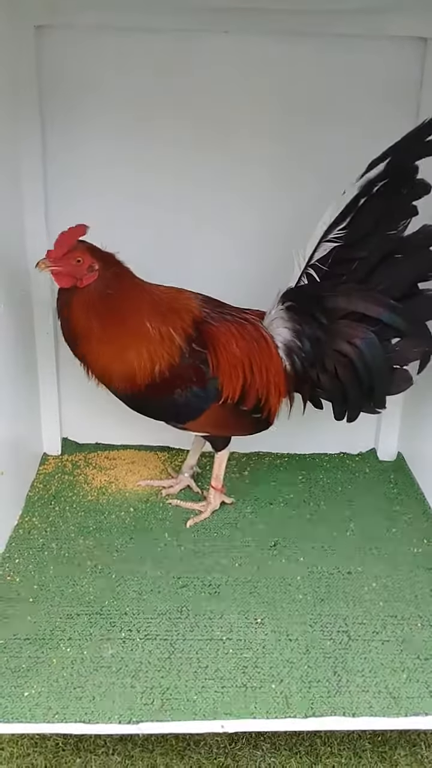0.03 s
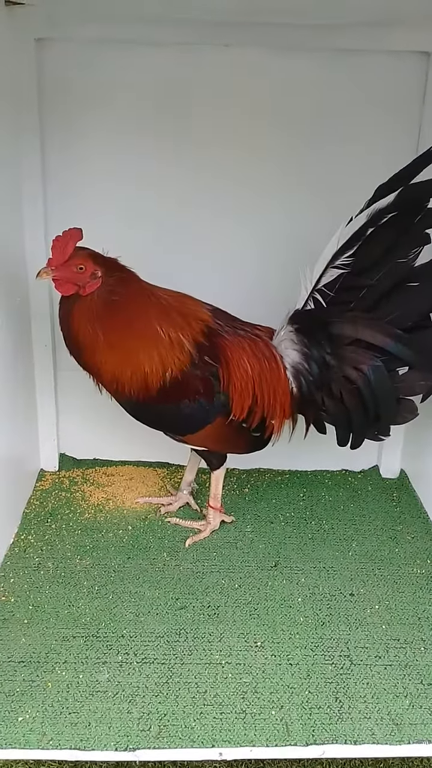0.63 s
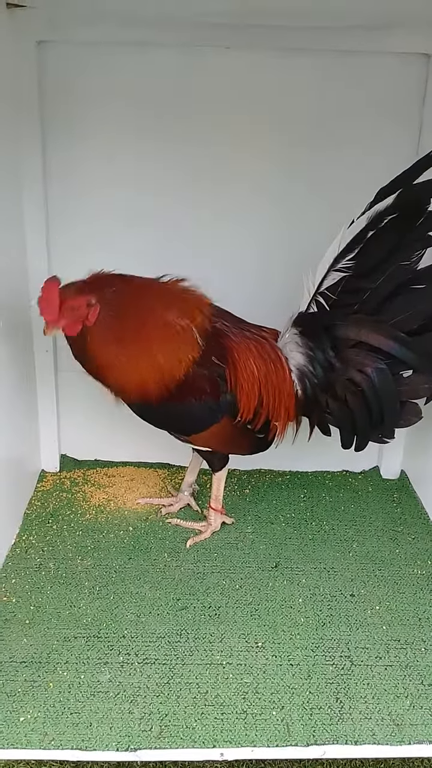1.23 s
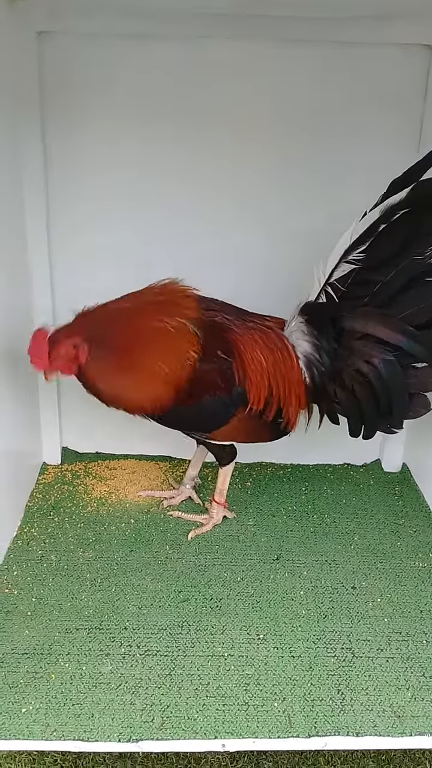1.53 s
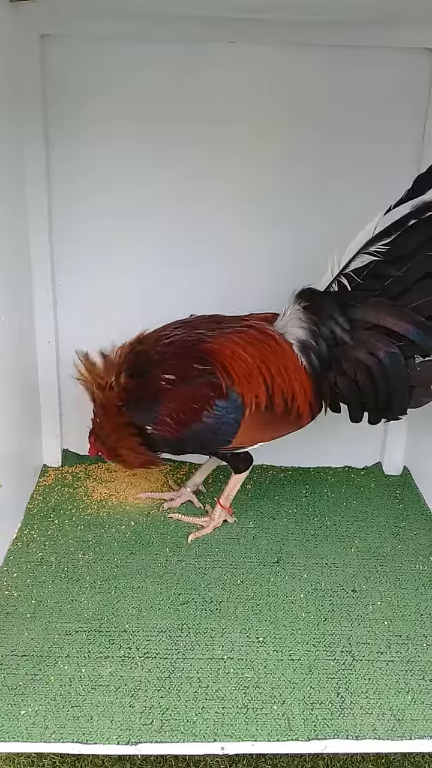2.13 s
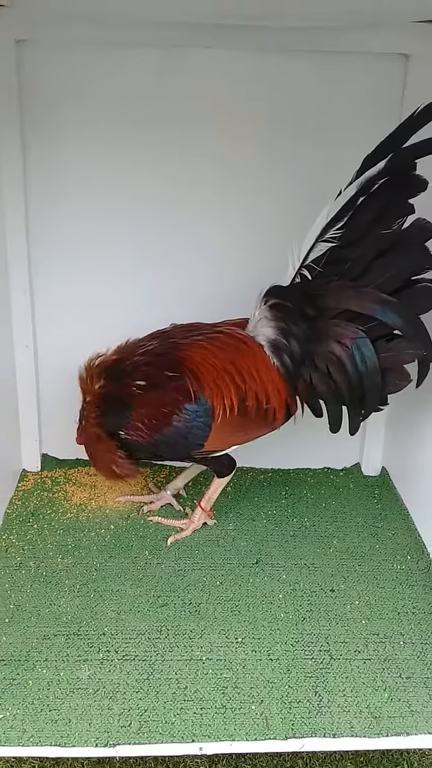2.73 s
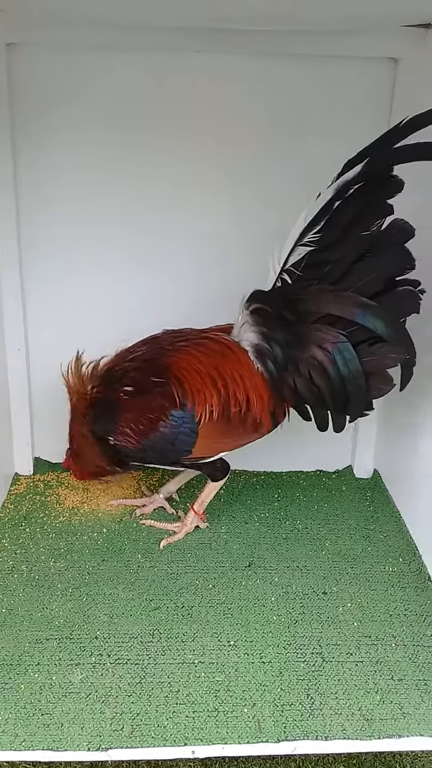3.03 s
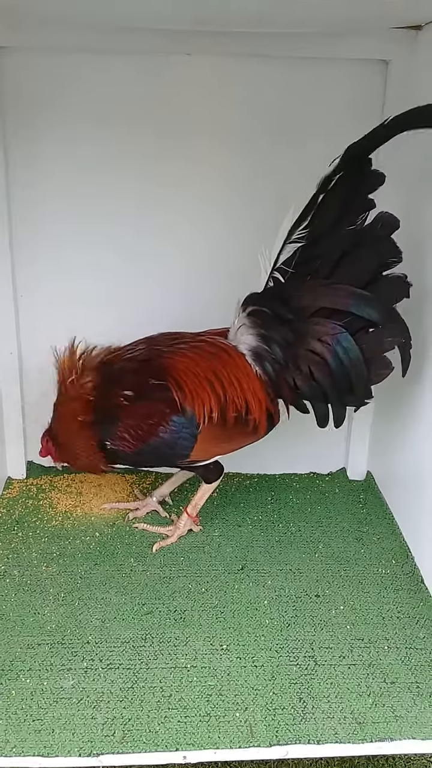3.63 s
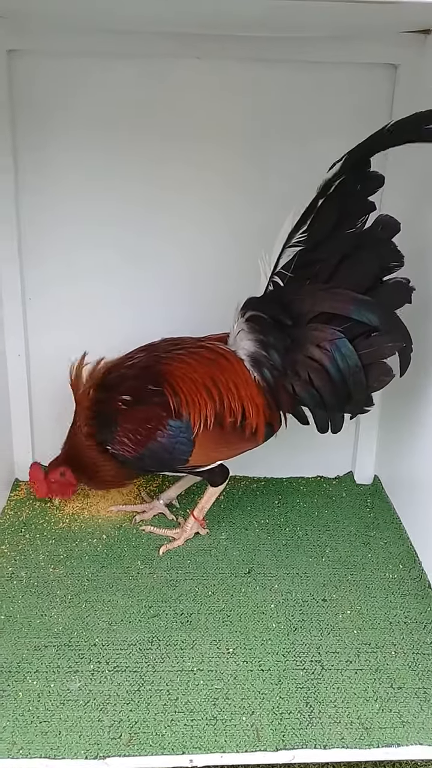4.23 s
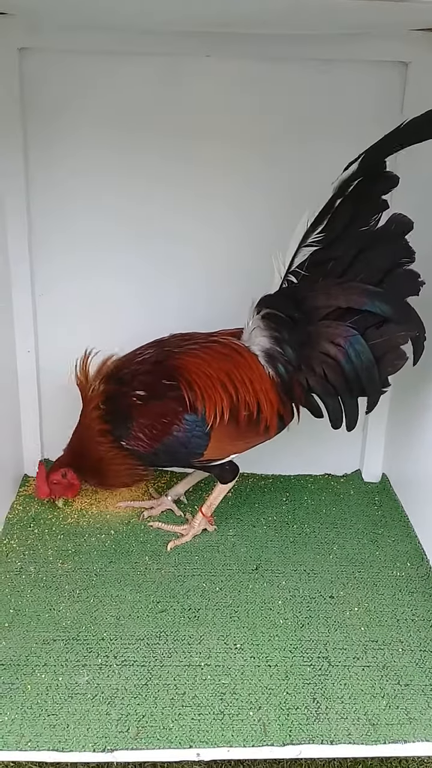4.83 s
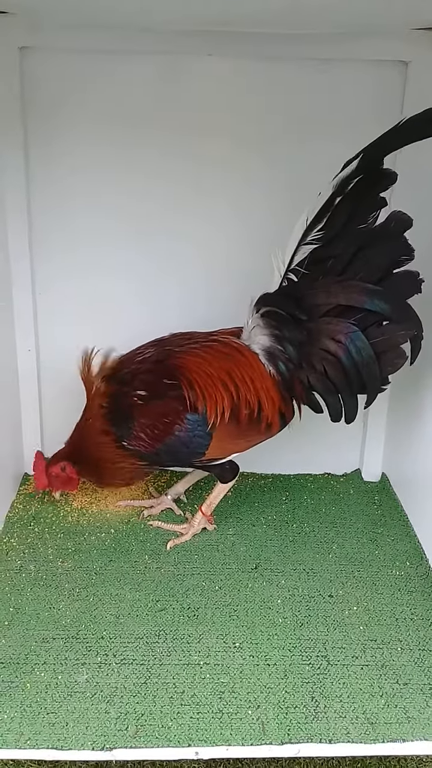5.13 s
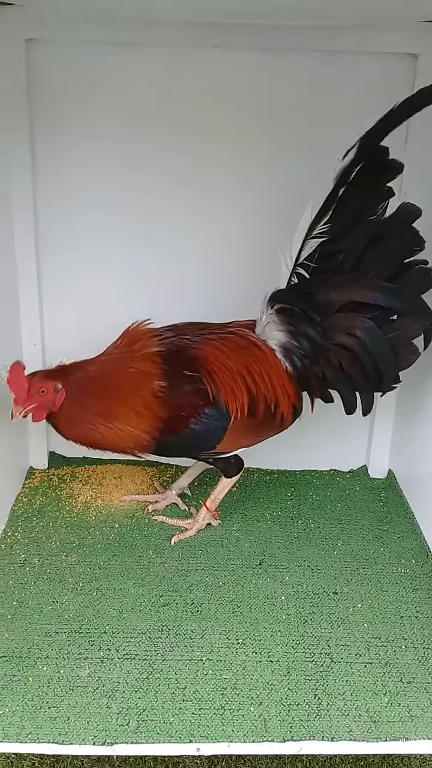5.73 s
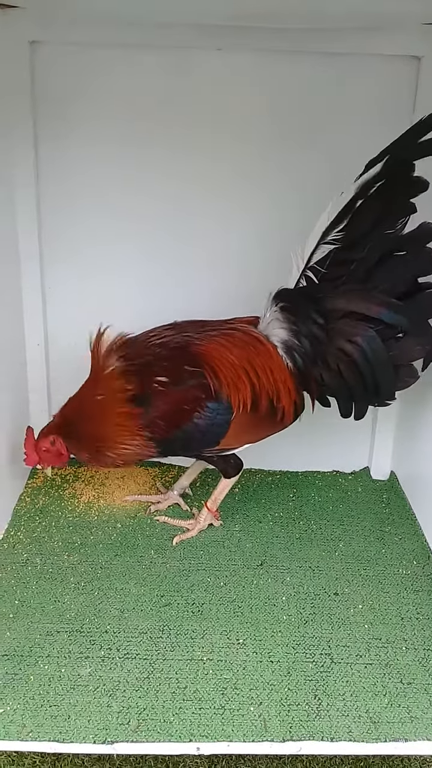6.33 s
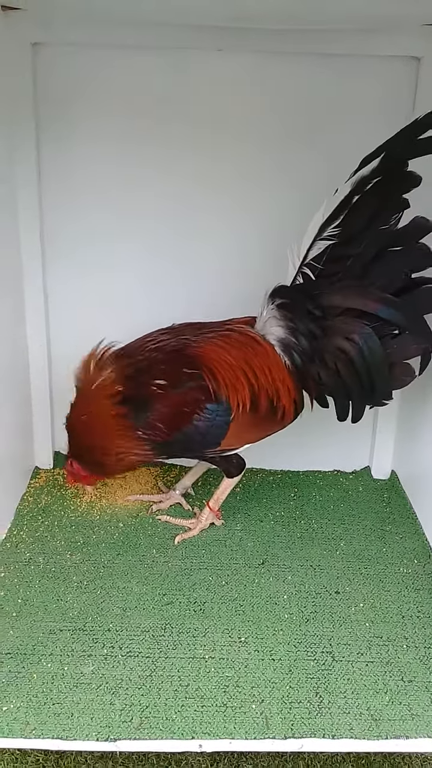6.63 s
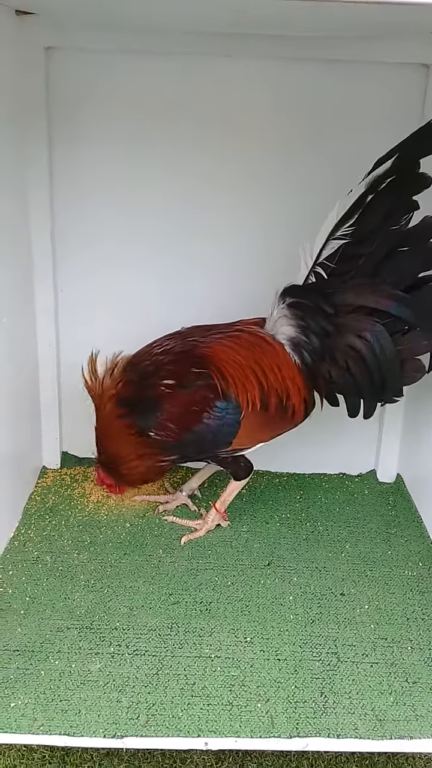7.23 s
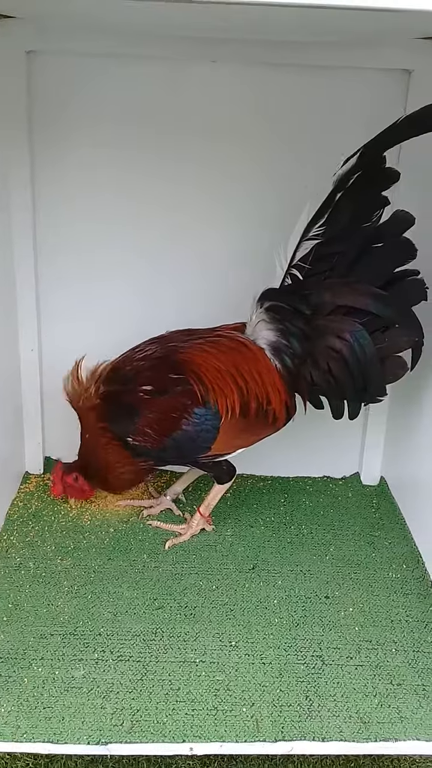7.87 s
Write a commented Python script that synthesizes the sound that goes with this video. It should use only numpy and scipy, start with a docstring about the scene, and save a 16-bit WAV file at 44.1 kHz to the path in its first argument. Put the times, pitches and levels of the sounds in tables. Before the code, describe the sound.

A faint outdoor background runs throughout, with thin chirps from small birds. In the first second come light scuffing pecks at grain on a turf mat, a soft cluck and a distant rooster. At about 1.2 seconds a nearby rooster crows, loud and raspy, in four syllables with a held last note, ending near 2.6 seconds with a short echo. Dull thumps on the pen's hollow floor land at about 2.3, 2.6 and 3.9 seconds, among quick pecks and tiny grain rattles. From 3 to 5.6 seconds roosters crow faintly across the yard, while short soft clucks and rustles come close by between 4.5 and 5.7 seconds. At 5.8 seconds a second nearby rooster crows, louder and equally hoarse, its last note sinking and ending near 7.2 seconds. Light pecks, soft knocks and faint far crowing continue to the end at about 8 seconds.

```python
"""Roosters around a pen

Two roosters crow in turn close to a small pen, where a third pecks grain from a turf mat on a hollow
floor and clucks. Each crow is two voices at once, one from each side of the syrinx, breaking into rasp
where they fight. More roosters answer from across the yard and small birds chirp, over soft rustles,
puffs of air and a faint outdoor background."""
import sys
import numpy as np
from scipy import signal
from scipy.fft import rfft, irfft, next_fast_len
from scipy.io import wavfile
from scipy.ndimage import map_coordinates

SR = 44100
rng = np.random.default_rng(int(sys.argv[2]) if len(sys.argv) > 2 else 0)


def int16_out(signal):
    """Quantize to a 16-bit WAV file."""
    q = np.round(np.clip(np.atleast_2d(signal).T, -1, 1) * 32767)
    wavfile.write(sys.argv[1], SR, q.astype(np.int16))


N = 357210


def near_roosters():
    """Source and filter: two birds crow in turn, each through its own syrinx and throat."""
    # Effort, one list a syllable. Each row: time in seconds, level in dB.
    effort_1, effort_2 = [
        [(1.17, -62.5), (1.178, -38), (1.212, -17), (1.278, -31.5), (1.288, -22), (1.346, -26), (1.42, -66.5)],
        [(1.43, -50), (1.434, -48.5), (1.45, -24.5), (1.504, -20), (1.58, -30.5)],
        [(1.58, -32.5), (1.628, -20.5), (1.756, -22.5), (1.802, -20.5), (1.948, -27), (1.984, -34),
         (1.992, -28), (2.1, -28.5)],
        [(2.1, -23), (2.124, -30), (2.15, -18.5), (2.18, -25), (2.3, -27), (2.306, -23.5), (2.612, -28),
         (2.62, -22)],
    ], [
        [(5.812, -43), (5.818, -29.5), (5.848, -16), (5.93, -14), (5.94, -19), (5.994, -18), (6.08, -19.5)],
        [(6.08, -26), (6.084, -24.5), (6.144, -10.5), (6.28, -18)],
        [(6.28, -15), (6.33, -14), (6.464, -12), (6.554, -16), (6.564, -10.5), (6.602, -20), (6.61, -11),
         (6.62, -23), (6.735, -33.5)],
        [(6.735, -26.5), (6.749, -30), (6.771, -9), (6.781, -21.5), (6.979, -14.5), (6.989, -23), (7.113, -28),
         (7.141, -18.5), (7.24, -39)],
    ]
    # Opening syllables. Each row: lower voice's start and end in Hz, upper voice's arch centre and
    # half-length in seconds and top in Hz, then in dB upper over lower voice, rasp over voices,
    # deep over bright rasp, overtone lift.
    opening_1, opening_2 = [(647, 670, 1.32, 0.071, 690, 10, -6.5, 3.5, -6),
                            (650, 679, 1.505, .08, 1008, -5, -4, 4.5, 5),
                            (683, 650, 1.77, 0.13, 788, 4.5, 0, -2.5, 3.5)], [(669.4, 596, 5.925, .14, 1005, 4, -4, 6.5, 1),
                                                   (580, 640, 6.195, 0.092, 1040, 1, -4, 5, 0.029),
                                                   (632, 540, 6.46, .15, 992, 10.5, -3.5, 2, 0.1)]
    # Closing syllable. Each row: time in seconds, lower and upper voice in Hz, then in dB upper over
    # lower voice, rasp over voices.
    closing_1, closing_2 = [(2.112, 626.6, 700, -18.5, -3), (2.159, 659.6, 750.6, -3.5, -13),
                            (2.22, 657.6, 852.4, 5, 6.5), (2.282, 650.2, 888.4, -5.5, -2),
                            (2.379, 637.6, 847, 5.5, -11), (2.45, 627, 812, 22, -17.5),
                            (2.62, 630, 807.8, 25, -11.5)], [(6.739, 589, 752, -7, -7), (6.77, 616.4, 747, 28, -12),
                                                   (6.793, 640, 865, 12, -8.5),
                                                   (6.936, 674.6, 861, -0.5, -35),
                                                   (6.976, 669.8, 756.5, -1, -17),
                                                   (7.015, 654, 735, -4.5, -10),
                                                   (7.141, 614.3, 695, -33, -37.5),
                                                   (7.181, 593, 700, -25, -10.5),
                                                   (7.239, 533.4, 692, -27, 4)]
    # The upper voice's rest pitch in Hz, and each voice's settings for syrinx() in dB.
    syrinx_1, syrinx_2 = dict(rest_hz=736, lower=dict(source_db=[-7, -7.5, 0, -3.5],
                          top_db=-14.5, tilt_db=4, carry_db=-9.5), upper=dict(source_db=[-1.5, -2.5, -9.5],
                          top_db=-3.5, tilt_db=-19.5, carry_db=-20)), dict(rest_hz=788, lower=dict(thin_db=-12, source_db=[-6, -2, -0.5, -7],
                                                top_db=-11, tilt_db=-9.5, carry_db=-1),
                                                upper=dict(source_db=[5, -5, -23],
                                                top_db=-11, tilt_db=-6, carry_db=-15))
    # Throat and beak above the lowest resonance. Each row: frequency in Hz, gain in dB.
    throat_1, throat_2 = [(900, -33.5), (1150, -1), (1400, 4), (1750, -1.5), (2050, 4), (2380, -7),
                          (2680, 2.5), (3100, -23.5), (3600, -7), (4400, -29), (5100, -29), (6050, -28),
                          (7000, -45.5), (8800, -75)], [(900, -27.5), (1150, 4), (1600, 0.5), (1900, 4), (2200, -7),
                                                (2520, 0), (3020, -23.5), (3350, -9), (3900, -13),
                                                (4350, -34), (5800, -27), (7000, -43.5), (9500, -52.5),
                                                (11000, -93.5)]
    # Narrow resonances between bird and pen; a harmonic flares as it crosses one.
    # Each row: centre in Hz, half-width in Hz, lift in dB.
    flares_1, flares_2 = [(738, 16, 16.5), (990, 40, 5), (1330, 14, 9), (1691, 52, 14.5), (2021, 45, 10.5),
                          (2527, 54, 8.5), (2700, 200, 3)], [(665, 22, 21.6), (758, 61, 9.6), (1076, 60, 21),
                                                (1730, 16, 22), (1851.4, 37, 14), (2020, 170, 4),
                                                (2494, 55, 4.4)]
    first = crow(effort_1, opening_1, closing_1, syrinx_1, throat_1, flares_1, -0.77, rasp_top_db=-3.5)
    second = crow(effort_2, opening_2, closing_2, syrinx_2, throat_2, flares_2, 0.42, rasp_top_db=-6)
    return first + second


def crow(efforts, openings, ending, bird, throat, flares, gain_db, rasp_top_db):
    """Biphonation: in four syllables, two voices share the effort with a rasp of quick uneven puffs."""
    # The throat's lowest resonance. Each row: frequency in Hz, gain in dB.
    low_resonance = [(200, -49.5), (450, -15.5), (580, -9.5), (660, 0.5), (780, 13.5), (950, 4.5),
                     (1100, -5.5), (1400, -26.5), (2200, -62), (5000, -110)]
    rasp_colour = [(hz, db + rasp_top_db * (hz > 3000)) for hz, db in throat]
    out = np.zeros(N)
    for i, effort in enumerate(efforts):
        start, fade, (effort_db,) = curves(effort)
        n = len(fade)
        t = start + np.arange(n) / SR
        slack_db = effort_db.max() - effort_db
        if i < len(openings):
            syllable = opening(t, slack_db, openings[i], bird["rest_hz"])
        else:
            syllable = closing(t, ending)
        low_hz, high_hz, lead_db, rough_db, depth_db, shine_db = syllable
        shine_db = shine_db + 0.23 * (effort_db - effort_db.mean())  # effort brightens the overtones
        voices_db, rasp_db = split(effort_db + gain_db, rough_db)
        low_db, high_db = split(voices_db, lead_db)
        bright_db, deep_db = split(rasp_db, depth_db - 1.4 * slack_db)  # deep rasp drops out first
        lower = syrinx(low_hz, low_db, bright_db, shine_db, throat, flares, **bird["lower"])
        upper = syrinx(high_hz, high_db, bright_db, shine_db, throat, flares, **bird["upper"])
        puffs = unit(undb(2 * wander(300, n)))
        rasp = undb(deep_db) * noise(low_resonance, n) + undb(bright_db) * noise(rasp_colour, n)
        add(out, start, fade * (lower + upper + puffs * rasp))
    return out


def opening(t, slack_db, row, rest_hz):
    """Independent oscillators: the lower voice slides while the upper arches up from its rest pitch."""
    from_hz, to_hz, top_s, half_s, top_hz, lead_db, rough_db, deep_db, shine_db = row
    arch = np.maximum(1 - np.abs((t - top_s) / half_s) ** 2.8, 0)  # flat-topped
    low_hz = np.linspace(from_hz, to_hz, len(t))
    high_hz = rest_hz + (top_hz - rest_hz) * arch
    lead_db = lead_db - 0.94 * slack_db  # the upper voice drops out first as effort falls
    return low_hz, high_hz, lead_db, rough_db, deep_db, shine_db


def closing(t, rows, deep_db=3, shine_db=-3):
    """Competing oscillators: in the long last syllable one voice wins and sinks in pitch."""
    times, *columns = np.transpose(rows)
    return [np.interp(t, times, column) for column in columns] + [deep_db, shine_db]


def syrinx(hz, level_db, rasp_db, shine_db, throat, flares,
           source_db, top_db, tilt_db, carry_db, thin_db=0):
    """Jitter and shimmer: the cycles of one side of the syrinx grow uneven as the rasp gains on it."""
    n = len(hz)
    levels = np.array([
        db + sum(lift * np.exp(-((k * hz - centre) / width) ** 2) for centre, width, lift in flares)
        for k, db in enumerate(source_db, 1)])
    levels[0] += thin_db * np.minimum(undb(rasp_db - level_db), 1)  # rasp thins the first harmonic
    levels = levels + level_db - 10 * np.log10(np.sum(undb(levels) ** 2, axis=0))
    chaos = np.minimum(undb(rasp_db - np.max(levels, axis=0)), 1)
    jitter = (.004 + .006 * chaos ** 1.5) * wander(240, n) + .01 * chaos * wander(45, n)
    phase = turn(hz * (1 + jitter))
    voice = np.zeros(n)
    for k, db in enumerate(levels, 1):
        shimmer_db = 2 * chaos * wander(100, n) + (1.37 + 2 * chaos) * wander(29.7, n)
        voice += undb(db + shimmer_db) * np.sin(k * phase)
    # The high overtones follow the middle ones and, by carry_db, the first harmonic.
    drive = np.sqrt(undb(levels[0] + carry_db) ** 2 + sum(undb(db) ** 2 for db in levels[1:]))
    for k in range(len(levels) + 1, 14):
        calm_db = tilt_db * (1 - chaos) * np.clip((k * hz - 3400) / 500, 0, 1)  # treble shelf when calm
        overtone_db = top_db + shine_db + calm_db + response(throat, k * hz) + 2 * wander(25, n)
        voice += drive * undb(overtone_db) * np.sin(k * phase)
    return np.sqrt(2) * voice


def clucks():
    """Voiced pulses: short falling notes of the feeding bird, each swelling softly."""
    # Each row: start and length in seconds, start and end pitch in Hz, level in dB, hoarseness 0-1.
    notes = [(0.346, 0.03, 380, 322, -27, 0.54), (0.342, 0.057, 267, 232, -32.5, 0),
             (2.611, 0.05, 736, 635, -23.5, 0.34), (4.568, 0.024, 787, 464, -33.5, 0.72),
             (4.732, 0.012, 624, 570, -40.5, 0.54), (4.87, 0.031, 646, 555, -34, 0.32),
             (4.88, 0.02, 573, 516, -28.5, 0.02), (5.22, 0.03, 688, 623, -27, 0.4),
             (5.237, 0.032, 564, 523, -30, 0.02), (5.73, 0.036, 1004, 680, -26, 0.37)]
    # Throat resonances. Each row: frequency in Hz, gain in dB.
    throat = [(150, -16), (290, -1), (540, 1.5), (900, -2.5), (1100, -10), (1400, -6), (1900, -30.5),
              (2800, -30.5), (4500, -57.5), (9000, -86.5)]
    out = np.zeros(N)
    for start, length, from_hz, to_hz, db, hoarse in notes:
        u = np.linspace(0, 1, int(length * SR))
        swell = np.sin(np.pi * u ** .8) ** 2
        voice = call(from_hz + (to_hz - from_hz) * u, hoarse, throat, jitter=0.04)
        add(out, start, undb(db) * swell * voice)
    return out


def call(hz, hoarse, throat, jitter):
    """Source and filter: harmonics and rasp pass through one throat, at an rms near 1."""
    n = len(hz)
    phase = turn(hz * (1 + jitter * wander(150, n)))
    gains = [undb(response(throat, k * hz)) for k in range(1, 8)]
    tone = sum(g * np.sin(k * phase) for k, g in enumerate(gains, 1))
    tone /= np.sqrt(sum(g ** 2 for g in gains) / 2)
    share = np.clip(hoarse, 0, 1)
    return np.sqrt(1 - share ** 2) * tone + share * noise(throat, n)


def thumps():
    """Damped modes: blows through the mat ring the hollow floor and knock its boards."""
    # Each row: start in seconds, level in dB, boards over floor in dB.
    blows = [(1.474, -39, -9), (1.598, -31, 2.5), (1.701, -47, 17), (2.304, -14.5, -7.5),
             (2.615, -17.5, -1), (3.118, -32, -3), (3.919, -21, -6), (5.453, -37.5, 2), (6.89, -35.5, 0),
             (7.374, -37, 3), (7.928, -30.5, -4)]
    # Each row: mode frequency in Hz, level in dB, time to fall 60 dB in seconds.
    floor_modes, board_modes = [(122.2, 2, 0.11), (163.7, -2.5, 0.15)], [(325, -2.5, 0.052), (356.5, 3, 0.041),
                                                     (466, 2.5, 0.05), (557, -7, 0.097), (984, 0, 0.052),
                                                     (1270, -1.5, 0.029)]
    out, t = np.zeros(N), np.arange(SR // 3) / SR
    attack = 1 - np.exp(-t / 0.0044)

    def ring(modes):
        return sum(undb(db - 60 * t / t60) * np.sin(2 * np.pi * hz * (1 + .02 * rng.standard_normal()) * t)
                   for hz, db, t60 in modes)
    for start, db, knock_db in blows:
        add(out, start, undb(db) * attack * (ring(floor_modes) + undb(knock_db) * ring(board_modes)))
    return out


def pecks(flicker_db=0.5, tail_s=0.014):
    """Friction and impact noise: the beak scuffs the turf and sets many small grains rattling."""
    # Each row: start and length in seconds, rattle of the grain in dB, scuff on the mat in dB.
    strokes = [(0.036, 0.058, -74, -45.5), (0.16, 0.054, -64, -41), (0.313, 0.045, -57.5, -44.5),
               (0.523, 0.043, -61.5, -57), (0.718, 0.018, -69, -43), (0.742, 0.05, -67, -47),
               (0.926, 0.077, -61.5, -51.5), (2.35, 0.015, -54.5, -41), (2.501, 0.017, -75, -49.5),
               (2.624, 0.055, -61, -31.5), (2.77, 0.014, -62.5, -37), (2.785, 0.1, -72, -48.5),
               (3.05, 0.078, -64, -70), (3.124, 0.0084, -68, -46), (3.203, 0.018, -60.5, -49),
               (3.221, 0.014, -67, -36), (3.319, 0.098, -67, -52.5), (3.387, 0.065, -54.5, -45),
               (3.617, 0.088, -67, -52), (3.777, 0.039, -68, -51), (5.383, 0.073, -73, -61),
               (5.449, 0.0078, -58, -34), (5.624, 0.023, -60.5, -55), (5.941, 0.03, -43.5, -52.5),
               (6.92, 0.024, -55, -42), (7.058, 0.024, -54.5, -31), (7.326, 0.036, -64, -43),
               (7.722, 0.056, -56.5, -52), (7.867, 0.084, -52.5, -43.5), (7.938, 0.048, -80, -40)]
    # Spectra of rattle and scuff. Each row: frequency in Hz, gain in dB.
    grain_colour, mat_colour = [(1500, -16), (3000, 2), (4200, -4), (5100, 10), (6000, -2.5), (7000, -7.5),
                                (8200, -21.5), (14000, -31.5)], [(100, -19), (350, -2), (800, 4), (1300, 1),
                                                      (2200, -3.5), (3000, -17), (5000, -53),
                                                      (10000, -49.5)]
    out, n = np.zeros(N), SR // 4
    t = np.arange(n) / SR
    for start, length, rattle_db, scuff_db in strokes:
        stroke = np.minimum(t / (.25 * length), 1) * np.exp(-np.maximum(t - .6 * length, 0) / tail_s)
        grains = unit(undb(flicker_db * wander(500, n)))
        rattle = undb(rattle_db) * noise(grain_colour, n)
        scuff = undb(scuff_db) * noise(mat_colour, n)
        add(out, start, stroke * grains * (rattle + scuff))
    return out


def far_roosters(attack_s=0.031, release_s=0.028):
    """Distant sources: gliding syllables cross the yard and arrive dull and mixed with reflections."""
    # Each row: start and length in seconds, start, middle and end pitch in Hz, level in dB,
    # swell from start to end in dB, hoarseness (all rasp from 1 up).
    syllables = [(0, 0.42, 438, 423.2, 455.6, -38, 5.5, 0.75),
                 (0.882, 0.28, 608, 633, 667, -50.5, 18, 0.48),
                 (3.048, 1.476, 439.5, 540.8, 509.8, -49.5, 3.5, .5),
                 (3.982, 0.79, 588.5, 634.6, 609, -48, 9, 0.25),
                 (4.75, 0.38, 618, 640.3, 538.5, -44.5, -4.5, 0.85),
                 (5.258, 0.282, 663, 660, 687, -42, 7, .55), (5.511, 0.12, 663, 592, 582, -44.5, -19, 1.15),
                 (7.201, 0.23, 472, 449, 430, -49.5, -32.5, 0.68), (7.515, 0.12, 545, 617, 615, -47, 20, 0),
                 (7.625, 0.19, 630, 650, 660, -49, -2, 0)]
    # The throat heard from afar. Each row: frequency in Hz, gain in dB.
    throat = [(300, -52), (520, -3.5), (660, -16), (880, -2.5), (1270, 2), (1500, -6.5), (1640, -15.5),
              (1800, -8), (1950, -41.5), (2180, -17.5), (2800, -37), (4000, -39), (9000, -92)]
    out = np.zeros(N)
    for start, length, from_hz, mid_hz, to_hz, db, swell_db, hoarse in syllables:
        u = np.linspace(0, 1, int(length * SR))
        fade = np.clip(np.minimum(u / attack_s, (1 - u) / release_s) * length, 0, 1)
        voice = call(arc(u, from_hz, mid_hz, to_hz), hoarse, throat, jitter=.016)
        level_db = db + swell_db * (u - .5) + 1.96 * wander(71.7, len(u))
        add(out, start, fade * undb(level_db) * voice)
    return echoes(out, t60=.25, wet_db=-4)


def small_birds(bow=.02):
    """Frequency modulation: quick whistles whose pitch bows upward, smeared by the yard's echoes."""
    # Each row: start and length in seconds, start and end pitch in Hz, level in dB.
    chirps = [(0.09, 0.07, 3130, 3290, -62), (0.264, 0.056, 3680, 4070, -61),
              (0.461, 0.065, 5260, 3300, -62), (.592, 0.047, 2820, 2390, -56),
              (0.858, 0.12, 5450, 5600, -74), (1.048, 0.031, 2790, 3000, -54),
              (1.077, 0.057, 3690, 3380, -55), (1.125, .028, 3100, 2680, -56),
              (2.824, 0.046, 4100, 3290, -66), (4.16, 0.028, 3180, 2520, -58),
              (4.294, 0.051, 3730, 3270, -70), (4.402, 0.061, 3240, 5100, -61),
              (4.443, 0.073, 4110, 3280, -54), (4.467, 0.024, 5040, 3860, -51.5),
              (4.765, .091, 4250, 4520, -68), (4.902, 0.036, 3160, 2240, -55),
              (5.042, 0.062, 3960, 2940, -66), (5.255, 0.041, 3940, 3750, -62.5),
              (5.553, 0.036, 3660, 3060, -61), (7.283, .065, 4260, 3550, -60),
              (8.075, 0.033, 3780, 3900, -54)]
    out = np.zeros(N)
    for start, length, from_hz, to_hz, db in chirps:
        u = np.linspace(0, 1, int(length * SR))
        hz = arc(u, from_hz, (1 + bow) * (from_hz + to_hz) / 2, to_hz)
        phase = turn(hz * (1 + .025 * wander(500, len(u))))
        add(out, start, undb(db) * np.sqrt(2) * np.sin(np.pi * u) * np.sin(phase))
    return echoes(out, t60=.3, wet_db=2)


def air_puffs():
    """Pressure fluctuations: puffs of air on the microphone make a brief low rumble."""
    # Each row: start and hold in seconds, level in dB.
    puffs = [(.11, .02, -52.5), (1.47, .04, -46.5), (5.42, .02, -55), (6.61, .03, -45.5)]
    # Each row: frequency in Hz, gain in dB.
    colour = [(20, -16), (50, -1.5), (90, -2.5), (150, -7.5), (300, -22.5), (800, -59.5)]
    return swish(puffs, colour, flicker_db=4.5, rise_db_per_s=111, fall_db_per_s=74)


def rustles():
    """Modulated noise: soft rustles flicker between the pecks."""
    # Each row: start and hold in seconds, level in dB.
    swells = [(4.47, 0.023, -57), (4.82, 0.3, -50.5), (5.45, .16, -48.5)]
    # Each row: frequency in Hz, gain in dB.
    colour = [(1200, 13.5), (2200, 5.5), (3300, -8), (4700, -8.5), (5600, -20.5), (8000, -36)]
    return swish(swells, colour, flicker_db=3.0, rise_db_per_s=212, fall_db_per_s=135)


def yard(air_db=-52, hum_hz=50, hum_db=-62, hiss_db=-77):
    """Noise floor: a soft outdoor background that swells a little, a low hum and a steady hiss."""
    # Each row: frequency in Hz, relative spectral density in dB.
    colour = [(15, -26), (25, -4.5), (169, 0), (267, -6), (482, -2.5), (552, -4), (762, -6), (1240, -7.5),
              (1570, -12), (1750, -16), (1950, -20), (3260, -34), (5140, -37), (6730, -56.5),
              (15500, -33.5)]
    air = undb(air_db + wander(3.3, N) + 0.5 * wander(20, N)) * noise(colour, N)
    air = signal.sosfilt(signal.butter(2, 65, "high", fs=SR, output="sos"), air)
    hum = undb(hum_db) * np.sqrt(2) * np.sin(turn(hum_hz + 0.85 * wander(9.4, N)))
    return air + hum + undb(hiss_db) * rng.standard_normal(N)


def swish(rows, colour, flicker_db, rise_db_per_s, fall_db_per_s):
    """Exponential envelopes: flickering rushes of noise swell, hold and fade."""
    t = np.arange(N) / SR
    swell = sum(undb(db - rise_db_per_s * np.maximum(start - t, 0)
                     - fall_db_per_s * np.maximum(t - start - hold, 0)) for start, hold, db in rows)
    return swell * undb(flicker_db * wander(44, N)) * noise(colour, N)


def echoes(x, t60, wet_db):
    """Reverberation: direct sound plus a dense tail of reflections, at unchanged power."""
    t = np.arange(SR) / SR
    reflections = rng.standard_normal(SR) * undb(-60 * t / t60) * (t > .003)
    impulse = undb(wet_db) * unit(reflections) / np.sqrt(SR)
    impulse[0] = 1
    return signal.fftconvolve(x, impulse)[:N] / np.sqrt(np.sum(impulse ** 2))


def undb(db):
    """Decibels to gain."""
    return 10 ** (np.asarray(db) / 20)


def unit(x):
    """Scale to an rms of 1."""
    return x / np.sqrt(np.mean(x ** 2) + 1e-20)


def split(total_db, lead_db):
    """Powers add: share a level between two parts, the second louder by lead_db."""
    first_db = total_db - 10 * np.log10(1 + undb(lead_db) ** 2)
    return first_db, first_db + lead_db


def response(points, hz):
    """Frequency response in dB of a (Hz, dB) outline."""
    f, db = np.transpose(points)
    return np.interp(np.log(np.maximum(hz, 1)), np.log(f), db)


def noise(points, size):
    """Spectral shaping: noise of rms near 1 with the given outline."""
    n = next_fast_len(size + 2048)
    gain = undb(response(points, np.arange(n // 2 + 1) * SR / n))
    return unit(irfft(rfft(rng.standard_normal(n)) * gain, n))[:size]


def wander(rate, size):
    """Random levels, rate a second, joined smoothly; spread near 1."""
    at = np.arange(size) * rate / SR
    return map_coordinates(rng.standard_normal(4096), [at], order=3, mode="mirror")


def curves(rows):
    """A table at every sample of its span: start time, a short fade at both ends, its columns."""
    times, *columns = np.transpose(rows)
    t = np.arange(times[0] - .01, times[-1] + .01, 1 / SR)
    fade = np.sin(np.pi / 2 * np.clip(np.minimum(t - t[0], t[-1] - t) / 0.02, 0, 1)) ** 2
    return t[0], fade, [np.interp(t, times, column) for column in columns]


def arc(u, start_hz, mid_hz, end_hz):
    """A parabola through three pitches as u runs from 0 to 1."""
    return np.polyval(np.polyfit([0, .5, 1], [start_hz, mid_hz, end_hz], 2), u)


def turn(hz):
    """Phase as the integral of frequency."""
    return 2 * np.pi * np.cumsum(hz) / SR


def add(out, start, x):
    """Mix a sound into out at a time in seconds."""
    i = int(round(start * SR))
    lo, hi = max(i, 0), min(i + len(x), N)
    if hi > lo:
        out[lo:hi] += x[lo - i:hi - i]


def scene():
    """Superposition: crowing and feeding carry the pen's short echo; the yard lies behind them."""
    crows = echoes(near_roosters(), t60=.36, wet_db=-8)
    feeding = echoes(clucks() + thumps() + pecks(), t60=0.25, wet_db=-8)
    return (crows + feeding + air_puffs() + rustles() + far_roosters() + small_birds() + yard())[None]


def record(dry):
    """Band limiting: an elliptic low-pass cuts the top steeply."""
    return signal.sosfilt(signal.ellip(10, .1, 80, 15450, fs=SR, output="sos"), dry)


dry = scene()
out = record(dry)
int16_out(out)
```